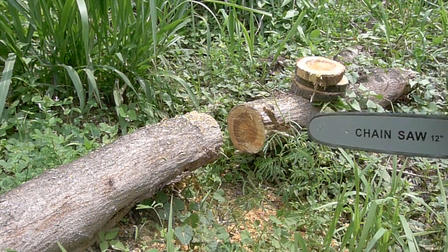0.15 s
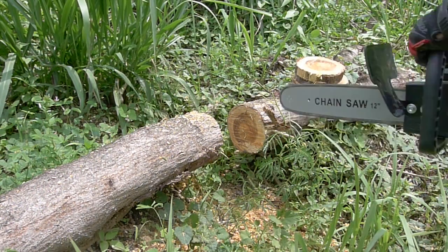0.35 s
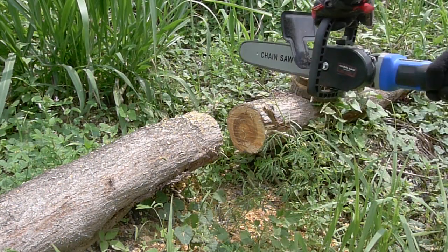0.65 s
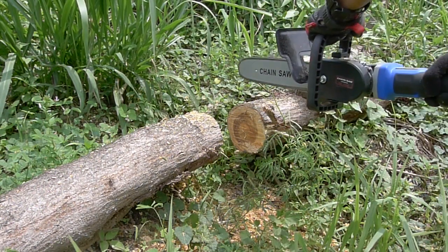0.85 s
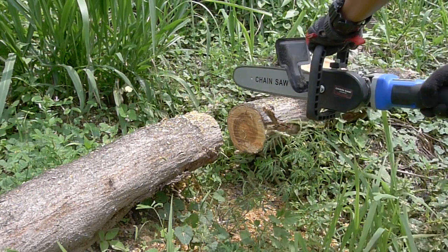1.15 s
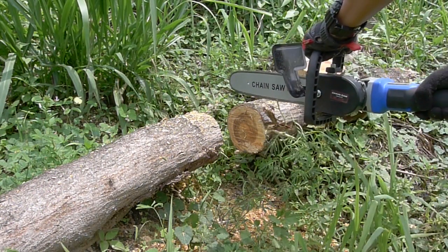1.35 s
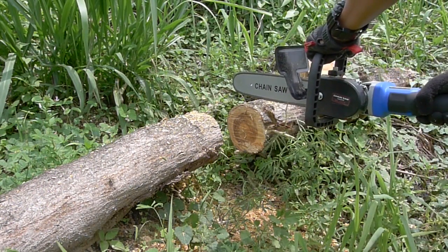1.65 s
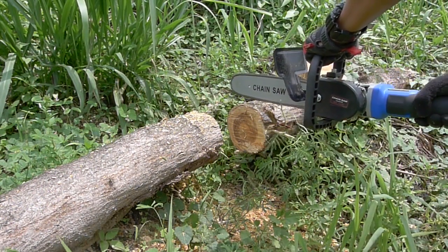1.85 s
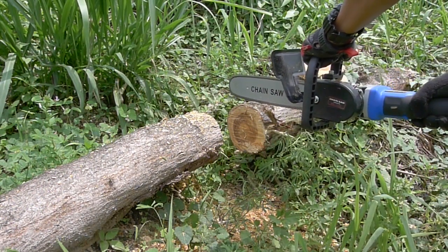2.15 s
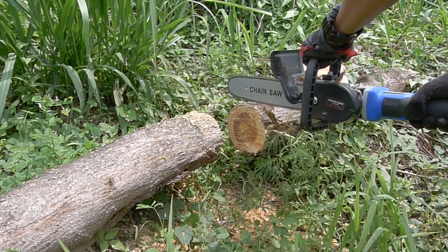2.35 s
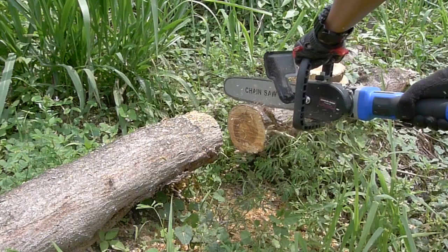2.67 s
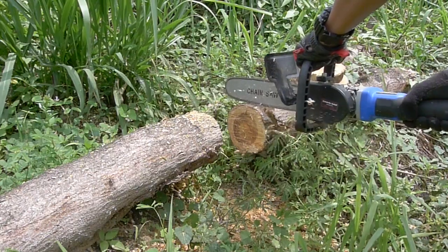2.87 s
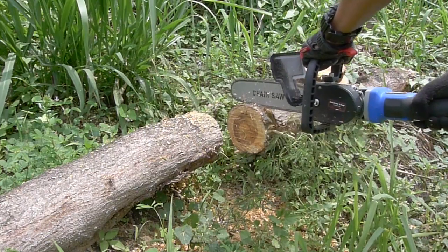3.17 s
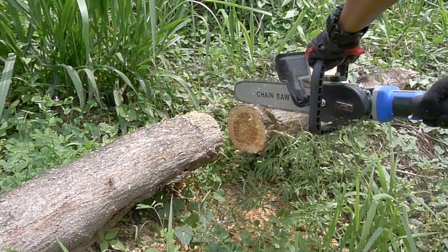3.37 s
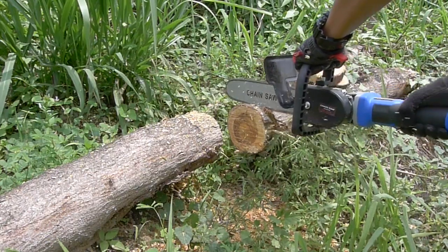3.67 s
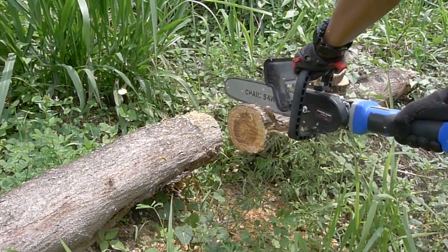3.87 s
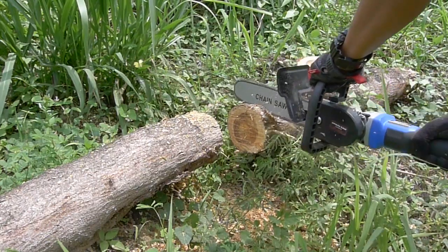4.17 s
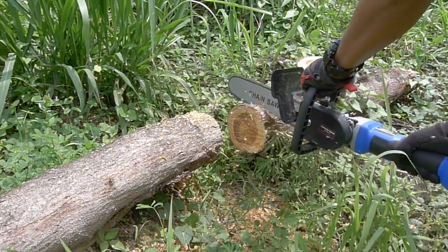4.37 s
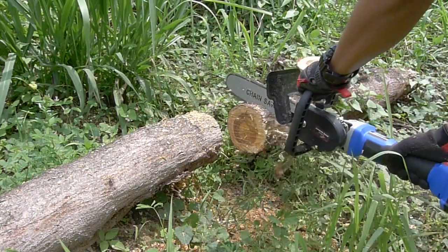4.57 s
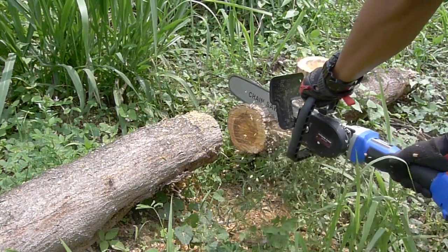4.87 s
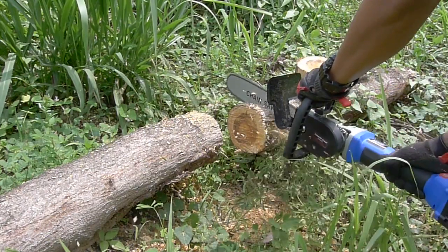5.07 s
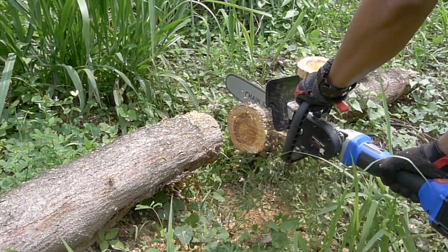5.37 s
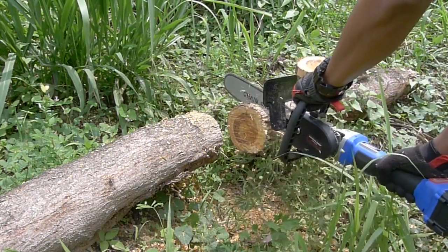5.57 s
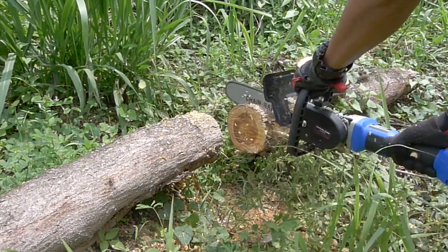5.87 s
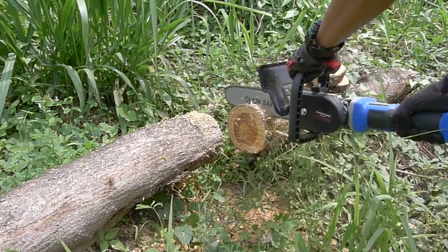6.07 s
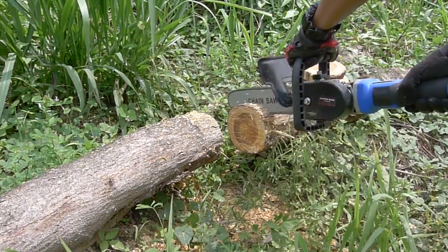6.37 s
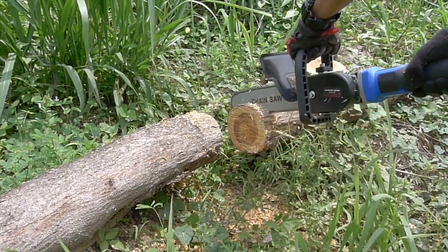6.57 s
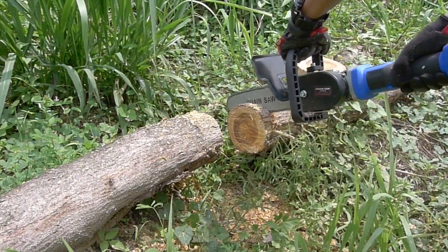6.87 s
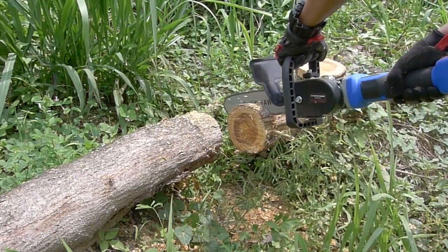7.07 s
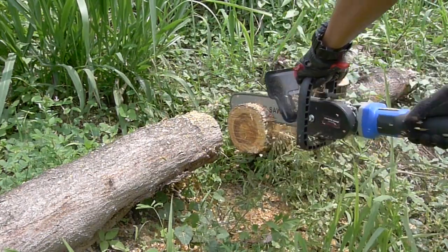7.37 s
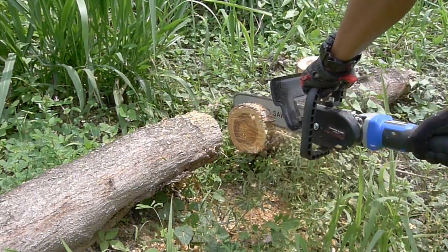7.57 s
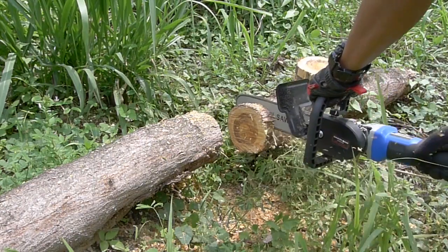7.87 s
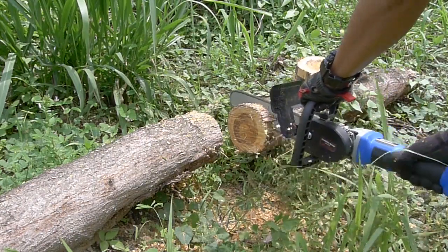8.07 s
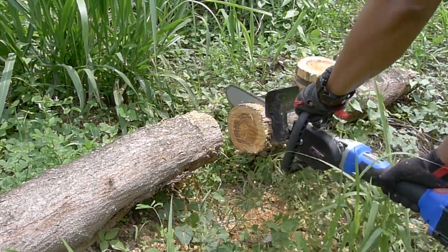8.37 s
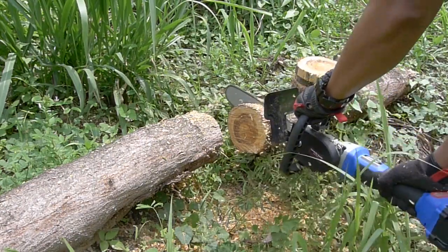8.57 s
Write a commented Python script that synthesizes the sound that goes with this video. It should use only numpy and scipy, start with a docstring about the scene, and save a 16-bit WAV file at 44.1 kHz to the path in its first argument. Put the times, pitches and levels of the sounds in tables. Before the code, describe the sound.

A cordless electric chainsaw whines up to speed with a rattling chain, then cuts into a log, chattering, rasping and screeching.

```python
"""A cordless angle grinder with a chainsaw bar cuts a log outdoors, heard from close by.
First the slack chain slaps the bar while the motor's whine sweeps up through the gear case's resonances.
Speed pulls the chain taut; it rattles round the bar, ringing the steel, and the fan hisses.
From about 2.4 s the saw is fed into the log: the motor sags and the cutters chatter, biting in bursts
that tear, rasp and knock the wood, while the chain screeches in the cut. The air rumbles throughout."""
import sys
import numpy as np
from scipy import signal
from scipy.fft import rfft, irfft
from scipy.io import wavfile
from scipy.ndimage import uniform_filter1d

SR = 44100
rng = np.random.default_rng(int(sys.argv[2]) if len(sys.argv) > 2 else 0)


def transcribe(signal):
    """Save signal, clipped to [-1, 1], as a 16-bit WAV file at the path in sys.argv[1]."""
    frames = np.atleast_2d(signal).T
    limited = np.clip(frames, -1, 1)
    pcm = np.round(limited * 32767).astype(np.int16)
    wavfile.write(sys.argv[1], SR, pcm)


N = 384552


# the motor tone that the load allows: time_s, pitch_hz
LOADED_SPEED = [(1.9, 769), (2.38, 742), (2.45, 678.5), (2.62, 642), (3.1, 626), (3.28, 640), (3.5, 625.7),
                (3.74, 578), (4.35, 604.7), (4.8, 584), (5.25, 594.5), (5.75, 551), (6.05, 564.8),
                (6.52, 553), (6.76, 579.8), (7.1, 513), (7.29, 535.7), (7.44, 506), (7.78, 592),
                (8.08, 590.5), (8.28, 548.5), (8.72, 568)]
def motor_speed(start_hz=256.6, climb_hz_per_s=343, ease_s=6.3):
    """Load-limited speed: the tone, in Hz, follows an easing soft start until the load holds it back."""
    t = np.arange(N) / SR
    climb = start_hz + climb_hz_per_s * ease_s * (1 - np.exp(-t / ease_s))
    return np.minimum(climb, curves(LOADED_SPEED)[0])


# motor harmonics and the gear case resonances they pass: multiple, peak_db, centre_hz, half_width_hz
GEAR_ORDERS = [(4, -25.8, 2550, 180), (8, -22.5, 2680, 230), (10, -26.5, 2570, 160)]
def whine(hz, tilt, feed, bite, lag_s=0.0051, surge_db_per_hz=0.1848, surge_span_s=0.76):
    """Forced vibration: motor harmonics swell near resonances of the gear case and housing."""
    t = np.arange(N) / SR
    strain = np.interp(t - lag_s, t, uniform_filter1d(bite, SR // 160))
    # the pitch frays when the tilted bar binds, and sags after each bite
    flutter = 0.00201 + feed * (0.008 + 0.0004 * np.maximum(tilt, 0))
    speed = hz * (1 + flutter * walk(170) - 0.007 * strain)
    phase = 2 * np.pi * np.cumsum(speed) / SR
    gear = sum(undb(db) * resonance(k * hz, centre_hz, half_width_hz) * np.sin(k * phase)
               for k, db, centre_hz, half_width_hz in GEAR_ORDERS)
    # in the cut the whine surges above the motor's recent speed and chokes below it
    cutting_hz = np.minimum(hz, 640)
    relief_hz = cutting_hz - uniform_filter1d(cutting_hz, int(surge_span_s * SR))
    gear_db = -0.17 * tilt + surge_db_per_hz * relief_hz * feed
    housing_db = -55 + 12.5 * resonance(2 * hz, centre_hz=1030, half_width_hz=135)
    second_gain = undb(housing_db + 3 * walk(90))
    second_harmonic = second_gain * np.sin(2 * phase + (0.25 + 0.3 * feed) * walk(110))
    flicker = undb(-3 * feed * strain + (2 * feed - 0.2) * walk(300))
    return np.sqrt(2) * steady(flicker) * (undb(gear_db) * gear + second_harmonic)


def chain_tension(links, sprocket_db=1.08, loop_db=0.17, loose_db=0.73):
    """Periodic loading: tension, in dB, swings once a sprocket turn and five times a lap of the chain."""
    sprocket = np.sin(2 * np.pi * links / 6)  # six teeth
    loop = np.sin(2 * np.pi * links * 5 / 44)  # 44 links
    return sprocket_db * sprocket + loop_db * loop + loose_db * walk(130)


# relative levels of the running chain: time_s, hiss_db, gear_case_db
CHAIN_LEVELS = [(0, -27, -32), (0.7, -28, -31), (1.7, -30.5, -37), (2.3, -30, -36), (2.8, -30, -38.5),
                (3.7, -30, -38), (4.4, -31.5, -36), (5.4, -30.5, -39.5), (6.2, -29.5, -35),
                (7.0, -30, -38.5), (7.5, -28.5, -34), (8.0, -30.5, -37), (8.72, -27.5, -33.5)]
# spectrum of the rattle and hiss: frequency_hz, density_db
CHAIN_SPECTRUM = [(1760, -17.5), (3000, -3.5), (3890, -9), (5140, -9.5), (5960, -7), (6810, -9),
                  (7100, -7.5), (8760, -8.5), (9600, -7.5), (12500, -12.5), (15100, -12), (16000, -20)]
def chain(links, tension_db, bite, hz, tilt, feed):
    """Impact excitation: links hit the sprocket and scrape over a smoother hiss, ringing bar and case."""
    hiss_db, case_db = curves(CHAIN_LEVELS)
    scrape = unit(fade(strikes(links, scatter_db=2.5), decay_s=0.00075))
    force = steady(undb(tension_db + 1.05 * bite))
    rattle = force * (scrape * noise() + undb(2) * noise())
    hiss = colour(rattle, CHAIN_SPECTRUM) * undb(hiss_db + 0.78)
    bar = bar_ring(force, feed, hiss_db) + bar_zing(force, hz, tilt)
    return hiss + bar + gear_case_ring(force, scrape) * undb(case_db + 2)


# modes of the steel bar: frequency_hz, bandwidth_hz, gain_db
BAR_MODES = [(3450, 25, -1), (4230, 60, -1), (5980, 25, 0), (6130, 60, -2), (7940, 20, -7)]
def bar_ring(force, feed, hiss_db, damping_db=3):
    """Contact damping: the bar rings freely in the air and more quietly in the cut."""
    return ring(force * noise(), BAR_MODES) * undb(hiss_db - 11 - damping_db * feed)


# a high mode of the bar: frequency_hz, bandwidth_hz, gain_db
ZING_MODE = [(7310, 85, 0)]
def bar_zing(force, hz, tilt, onset_hz=385, onset_width_hz=20):
    """Threshold of excitation: a high mode rings fitfully once up to speed, and fades with tilt."""
    excitation = 1 / (1 + np.exp((onset_hz - hz) / onset_width_hz))
    level_db = -39.5 - 0.16 * tilt + 1.9 * walk(14)
    return ring(force * noise(), ZING_MODE) * excitation * undb(level_db)


# modes of the gear case: frequency_hz, bandwidth_hz, gain_db
CASE_MODES = [(2460, 157, -2.5), (2730, 192, -2), (2920, 84, -1.5)]
def gear_case_ring(force, scrape):
    """Structure-borne sound: the blows of the links drive the gear case's modes."""
    case = ring(force ** 1.4 * scrape * noise(), CASE_MODES)
    return colour(case, [(1200, 7), (2250, 0), (2500, -4.5), (3100, -7.5), (3800, -5), (6000, -30)])


# chatter of the saw in the cut: time_s, bursts_per_s
CHATTER_RATE = [(2.4, 46), (2.65, 35.5), (4.0, 34), (5.5, 36), (6.75, 37), (7.4, 49), (7.8, 41), (8.72, 40)]
def chatter(feed):
    """Stick-slip: the saw digs in quickly and eases out; returns the bite's swing about its mean."""
    rate, = curves(CHATTER_RATE)
    phase = 2 * np.pi * np.cumsum(rate * (1 + 0.114 * walk(40))) / SR
    bounce = 0.933 * feed * unit(np.sin(phase) + 0.32 * np.sin(2 * phase) + 0.267 * walk(60))
    catch = 0.535 * snags(feed)
    # a hard catch interrupts the regular bouncing
    interruption = 1 + 2 * uniform_filter1d(catch ** 2, SR // 50)
    return catch * (0.737 + 0.34 * feed) + bounce / interruption


# the hardest catches of the cutters: time_s, relative_strength
HARD_CATCHES = [(0.283, 3), (0.36, 5.5), (0.424, 6.5), (0.665, 7.5), (2.237, 7.5), (2.634, 6.5), (2.754, 6),
                (2.783, 7), (2.897, 7), (2.977, 9), (3.573, 5.5), (3.624, 10), (4.096, 5.5), (4.594, 4.5),
                (4.961, 6), (5.359, 6), (6.094, 4), (6.327, 5), (6.822, 6), (7.551, 7), (7.941, 6),
                (8.137, 6), (8.565, 6)]
def snags(feed, free_per_s=1, fed_per_s=6, width_s=0.00299, lull=0.8):
    """Impulsive loading: each catch is a surge of force, with a lull on either side as the bar hops."""
    by_chance = rng.random(N) < (free_per_s + fed_per_s * feed) / SR
    catches = by_chance * (2.5 + 0.7 * noise())
    for time_s, strength in HARD_CATCHES:
        catches[int(time_s * SR)] += strength
    widths = np.arange(-SR // 25, SR // 25 + 1) / SR / width_s
    surge = np.exp(-widths ** 2 / 2) - lull / 3 * np.exp(-(widths / 3) ** 2 / 2)
    return signal.fftconvolve(catches, surge, "same")


# the slower the chain, the louder its cutters: motor_pitch_hz, relative_level_db
CUTTER_LEVELS = [(257, -32.5), (510, -34.5), (560, -35.5), (600, -37.5), (650, -37.5), (765, -38.5)]
# spectra of free cutters, tearing wood and rasping: frequency_hz, density_db
CLATTER_SPECTRUM = [(150, -31), (380, -21.5), (540, -5), (700, -4), (1150, -2.5), (1500, 1.5), (2100, -0.5),
                    (2400, -1.5), (3200, -22)]
TEAR_SPECTRUM = [(350, -19), (500, -8.5), (620, 2.5), (700, -2), (880, 1), (1100, -1), (1300, -3),
                 (1800, 2), (2050, -3), (2350, 0), (3200, -15)]
RASP_SPECTRUM = [(1800, -15), (2300, -11), (3300, -12), (3800, -7.5), (4300, -4.5), (4800, -9.5),
                 (6500, -37)]
def cutters(links, tension_db, bite, hz, feed):
    """Impact noise: a cutter on every second link clatters in the air, or tears and rasps in the log."""
    blows = unit(fade(strikes(links / 2, scatter_db=2), decay_s=0.0034))
    force = steady(undb(4 * bite + (0.5 - 0.37 * feed) * tension_db))
    contact = np.clip(1.4 * feed, 0, 1)
    clatter = colour(force * blows * noise(), CLATTER_SPECTRUM) * np.sqrt(1 - contact) * undb(0.1)
    tear = colour(force ** 0.78 * np.sqrt(blows) * noise(), TEAR_SPECTRUM) * np.sqrt(contact) * undb(1.5)
    wood = wood_ring(force, blows, feed, contact)
    rasp_force = steady(undb(1.5 * bite + tension_db))
    rasp_db = curves(CHAIN_LEVELS)[0] - 10.5 + 6.1 * contact
    rasp = colour(rasp_force * blows * noise(), RASP_SPECTRUM) * undb(rasp_db)
    level_db = np.interp(hz, *np.transpose(CUTTER_LEVELS))
    return (clatter + tear + wood) * undb(level_db) + rasp


# modes of the log and of the kerf, the slot cut in it: frequency_hz, bandwidth_hz, gain_db
LOG_MODES = [(92, 17, -19), (160, 27, -7.5), (228.3, 17.5, 2), (298, 62, -0.5), (436, 87, -10.5)]
KERF_MODES = [(620, 46, -3.5), (1069, 66, -7)]
def wood_ring(force, blows, feed, contact, loosening_db=2.5):
    """Modal response: log and kerf resonate, and the thinning slice knocks louder as the cut deepens."""
    depth = np.cumsum(feed) / np.sum(feed)
    log = ring(force * blows * noise(), LOG_MODES)
    knock = colour(log, [(40, -13), (150, 1.5), (450, 0), (900, -22)])
    kerf = ring(force * noise(), KERF_MODES) * undb(-11) * np.sqrt(feed)
    return knock * undb(-31 + 12.9 * contact + loosening_db * depth) + kerf


# the chain rubbing the walls of the cut: time_s, pitch_hz, level_db
WALL_RUB = [(2.4, 4500, -65), (3.1, 4500, -47), (3.5, 4320, -55), (3.7, 3657, -40), (4.4, 4225, -41),
            (5.6, 4050, -38), (6.3, 3721, -40), (6.9, 3760, -42), (7.42, 3550, -34), (7.68, 3810, -35),
            (7.95, 4053, -39.5), (8.25, 3807, -33.5), (8.72, 4000, -37)]
def screech(half_width_hz=115):
    """Friction excites a narrow, hoarse resonance that slides as the bar rocks in the cut."""
    hz, db = curves(WALL_RUB)
    lowpass = signal.butter(2, half_width_hz, fs=SR, output="sos")
    grip = signal.sosfilt(lowpass, noise() + 1j * noise())
    carrier = np.exp(2j * np.pi * np.cumsum(hz) / SR)
    return unit(np.real(grip * carrier)) * undb(db)


# slack chain slapping the bar: time_s, level_db
SLACK_LEVEL = [(0, -32.5), (.28, -31.5), (.4, -35), (.9, -47), (1.3, -60), (8.72, -71)]
# its clatter, and a brighter hiss while the bar is close at first: frequency_hz, bandwidth_hz, gain_db
SLACK_BANDS = [(1590, 130, 0), (995, 130, -4.5), (560, 116, -8), (6400, 350, -8.5), (7900, 510, -6),
               (10200, 700, -16)]
def slack_chain(tension_db):
    """Rattling contact: the loose chain clatters, with a bright hiss, until speed pulls it taut."""
    rattle = steady(undb(1.8 * tension_db)) * noise()
    return ring(rattle, SLACK_BANDS) * undb(curves(SLACK_LEVEL)[0])


def sprocket_hum(links, tilt, cutoff_hz=470):
    """Meshing tone: links meet the sprocket; the small housing radiates this poorly at low speed."""
    level_db = -51 - 0.68 * tilt + 3 * walk(70)
    tone = np.sqrt(2) * undb(level_db) * np.sin(2 * np.pi * links)
    return signal.sosfilt(signal.butter(4, cutoff_hz, "high", fs=SR, output="sos"), tone)


# spectrum of the outdoor air: frequency_hz, density_db
AIR_SPECTRUM = [(20, -16), (45, -0.5), (90, 4), (150, -4), (400, -10), (2000, -25)]
# its rumble: time_s, level_db
AIR_LEVEL = [(0, -61), (.9, -67), (1.3, -73.5), (3, -70.5), (8.72, -68)]
def air_rumble():
    """Ambient noise: the open air rumbles low, its level wavering."""
    return colour(noise(), AIR_SPECTRUM) * undb(curves(AIR_LEVEL)[0] + 1.2 * walk(5.2))


def steady(gain):
    """Running normalisation: keeps the loudness even over a tenth of a second; fast flutter remains."""
    return gain / np.sqrt(uniform_filter1d(gain ** 2, SR // 10))


def resonance(hz, centre_hz, half_width_hz):
    """Lorentzian resonance: gain 1 at the centre."""
    return 1 / (1 + ((hz - centre_hz) / half_width_hz) ** 2)


def ring(drive, modes):
    """Modal superposition: driven resonators add with alternating signs; rms 1."""
    return unit(sum((-1) ** k * undb(db) * signal.lfilter(*signal.iirpeak(hz, hz / width_hz, SR), drive)
                    for k, (hz, width_hz, db) in enumerate(modes)))


def colour(x, spectrum):
    """Spectral shaping by (frequency_hz, gain_db) points, silent outside them; rms 1."""
    hz, db = np.transpose(spectrum)
    bins_hz = np.maximum(np.fft.rfftfreq(2 * len(x), 1 / SR), 1)
    gain = undb(np.interp(np.log(bins_hz), np.log(hz), db, left=-np.inf, right=-np.inf))
    return unit(irfft(rfft(x, 2 * len(x)) * gain)[:N])


def strikes(cycles, scatter_db):
    """Impulse train: one blow of random size at each whole cycle."""
    return np.diff(np.floor(cycles), prepend=0) * undb(scatter_db * noise())


def fade(blows, decay_s):
    """Exponential decay of each blow."""
    return signal.lfilter([1], [1, -np.exp(-1 / (decay_s * SR))], blows)


def walk(knots_per_s):
    """Smooth random modulation with a spread near 1."""
    knots = rng.standard_normal(N // 8)
    return 1.2 * np.interp(np.arange(N) / SR * knots_per_s, np.arange(len(knots)), knots)


def noise():
    """Gaussian white noise."""
    return rng.standard_normal(N)


def curves(table):
    """Linear interpolation of a table's columns in time."""
    time_s, *columns = np.transpose(table)
    return [np.interp(np.arange(N) / SR, time_s, column) for column in columns]


def undb(db):
    """Decibels to amplitude ratio."""
    return 10 ** (np.asarray(db) / 20)


def unit(x):
    """Normalisation to rms 1."""
    return x / np.sqrt(np.mean(x ** 2))


# how hard the chain is fed into the wood: time_s, feed_share
FEED = [(0, 0.05), (2.35, 0), (2.55, 0.86), (3.6, 0.93), (5.5, 0.99), (6.2, 0.71), (7.3, 0.67), (7.9, 1),
        (8.72, 0.78)]
# the bar rocking over the log: time_s, nose_lift_deg
TILT = [(0, 2), (1.3, 11), (1.9, -3.5), (3.3, 9), (4.3, 15), (5.5, 30), (6.05, 1), (6.8, -5.5), (7.8, 3),
        (8.4, 18)]
def scene():
    """Superposition: one shaft speed drives whine, chain and cutters; the hands set feed and tilt."""
    hz = motor_speed()
    tilt, = curves(TILT)
    feed, = curves(FEED)
    bite = chatter(feed)
    link_hz = 1.023 * hz * (1 + 0.003 * walk(60))
    links = np.cumsum(link_hz) / SR  # count of links past the sprocket
    tension_db = chain_tension(links)
    motor = whine(hz, tilt, feed, bite) + sprocket_hum(links, tilt)
    steel = chain(links, tension_db, bite, hz, tilt, feed) + slack_chain(tension_db)
    cut = cutters(links, tension_db, bite, hz, feed) + screech()
    return np.tile(motor + steel + cut + air_rumble(), (2, 1))


def record(dry, notch_hz=7460, notch_width_hz=200, top_hz=15750):
    """Band limiting: the treble has one narrow notch and a steep upper edge."""
    notch = signal.iirnotch(notch_hz, notch_hz / notch_width_hz, SR)
    lowpass = signal.ellip(10, 0.1, 80, top_hz, fs=SR, output="sos")
    return signal.sosfilt(lowpass, signal.lfilter(*notch, dry))


dry = scene()
out = record(dry)
transcribe(out)
```